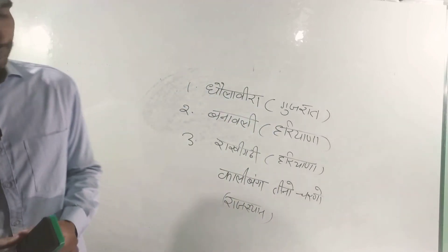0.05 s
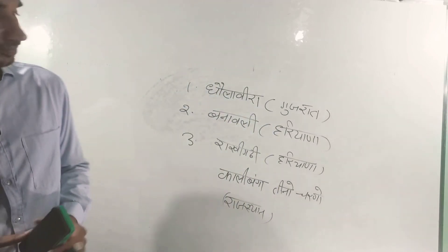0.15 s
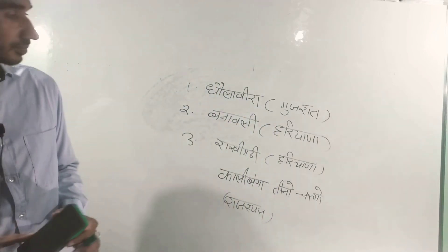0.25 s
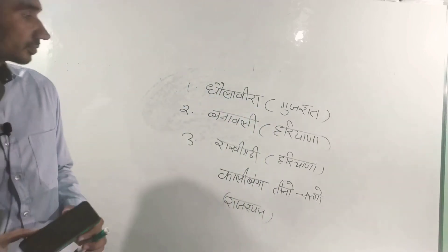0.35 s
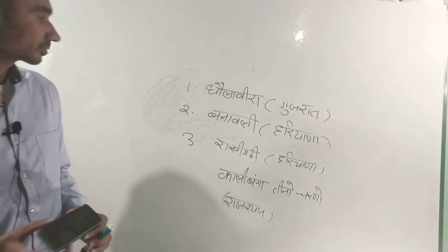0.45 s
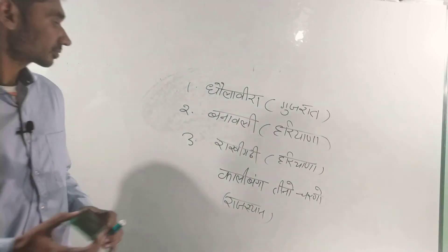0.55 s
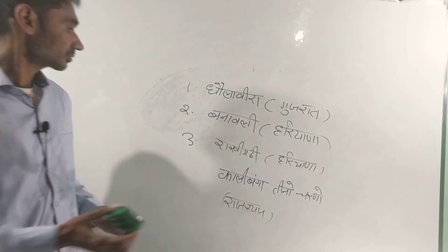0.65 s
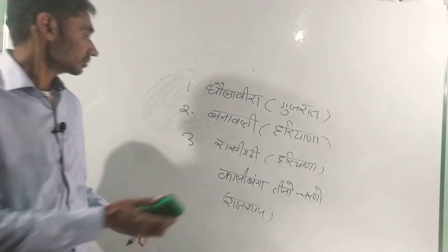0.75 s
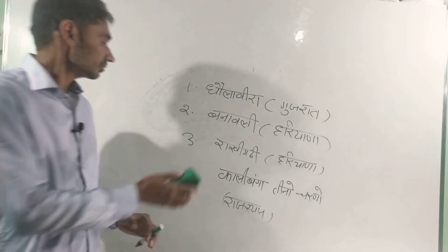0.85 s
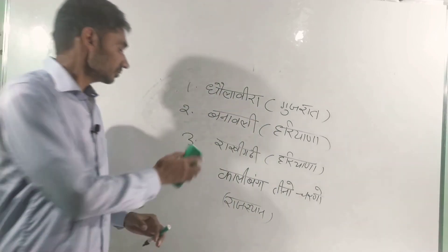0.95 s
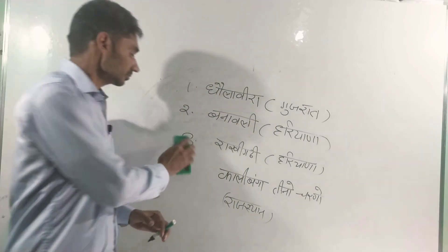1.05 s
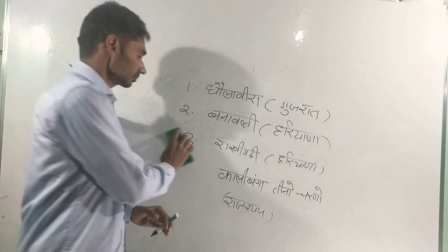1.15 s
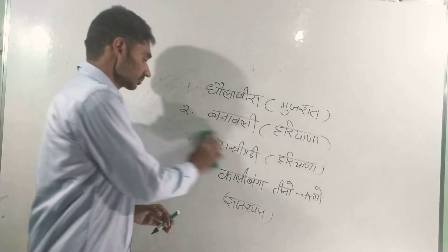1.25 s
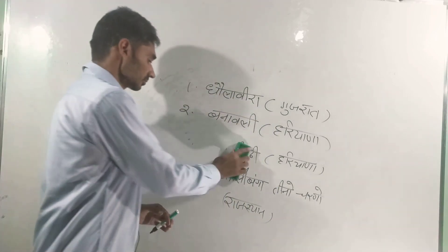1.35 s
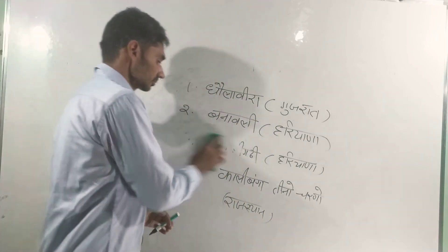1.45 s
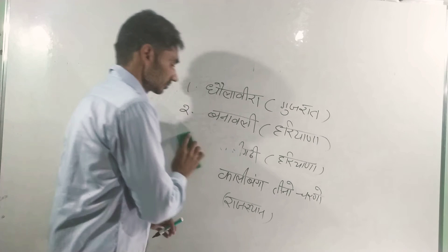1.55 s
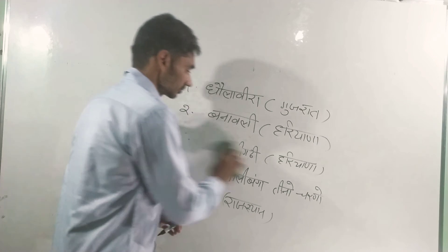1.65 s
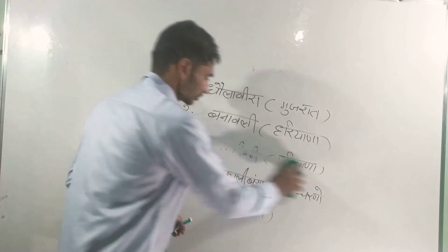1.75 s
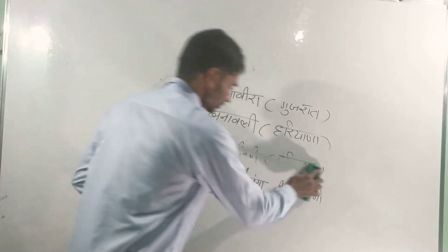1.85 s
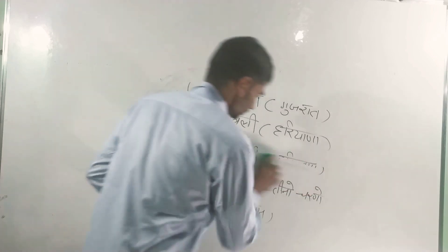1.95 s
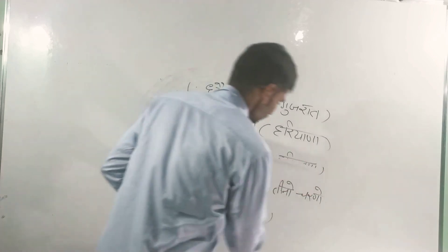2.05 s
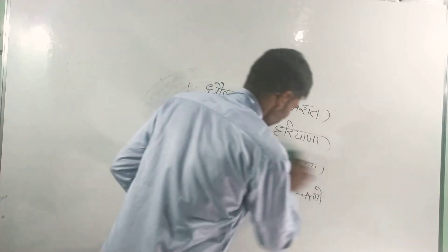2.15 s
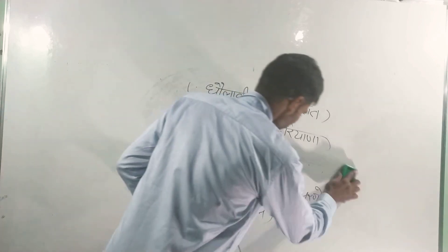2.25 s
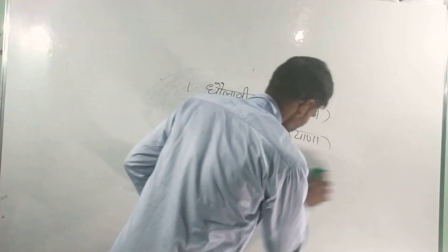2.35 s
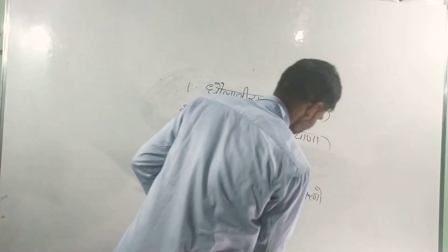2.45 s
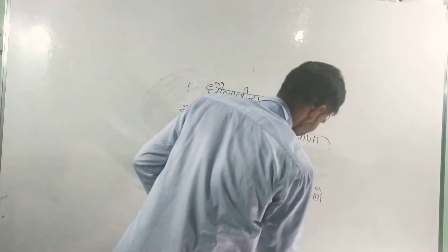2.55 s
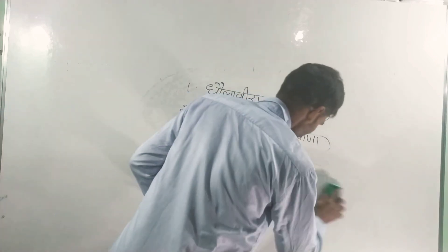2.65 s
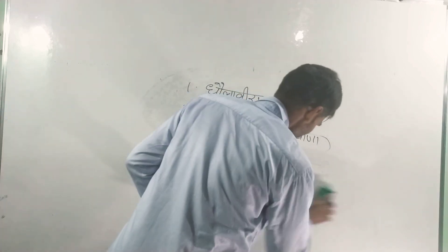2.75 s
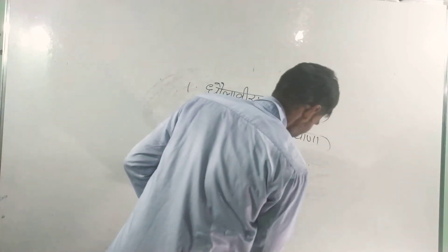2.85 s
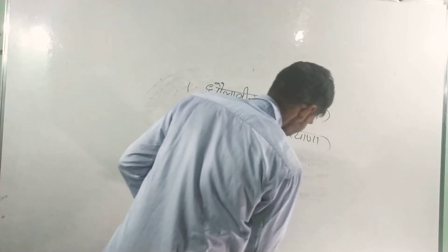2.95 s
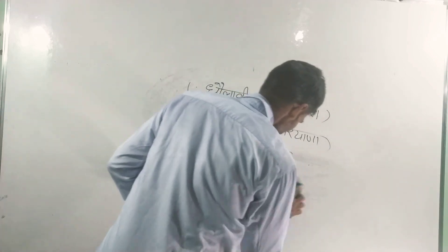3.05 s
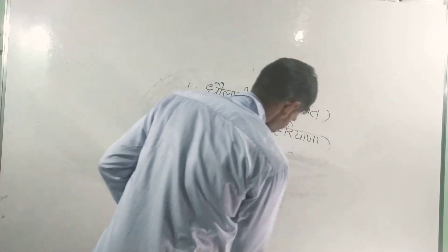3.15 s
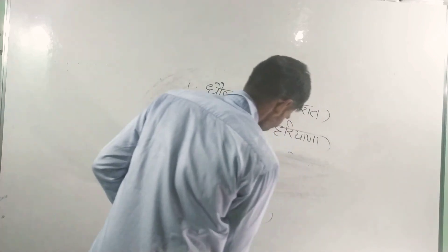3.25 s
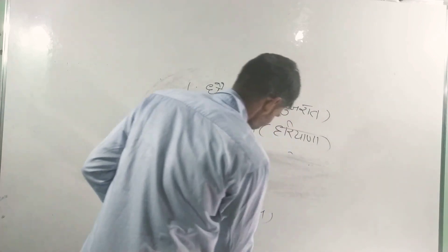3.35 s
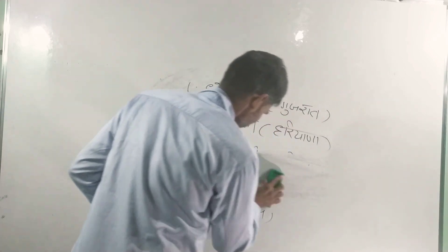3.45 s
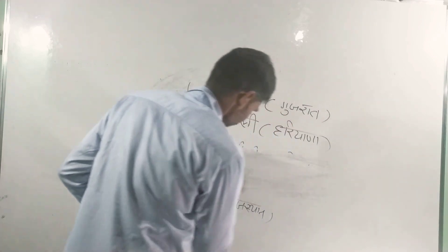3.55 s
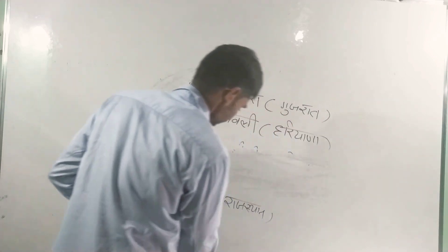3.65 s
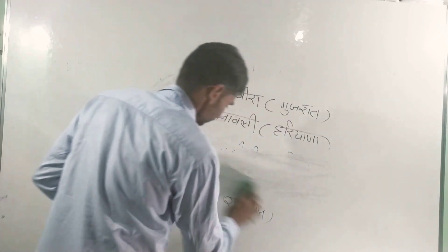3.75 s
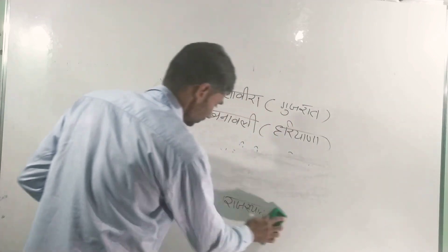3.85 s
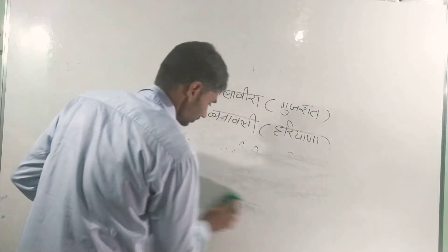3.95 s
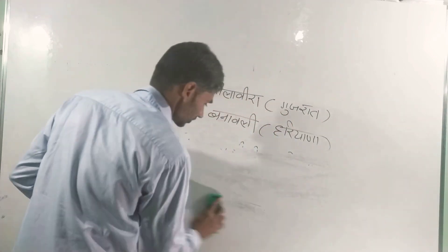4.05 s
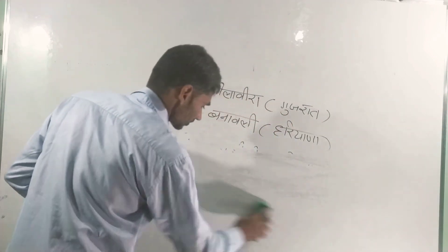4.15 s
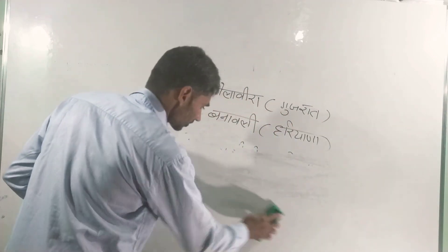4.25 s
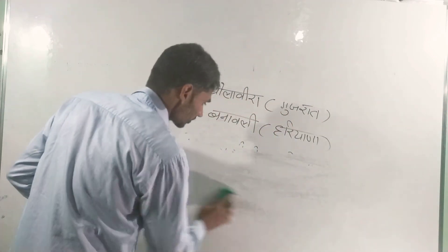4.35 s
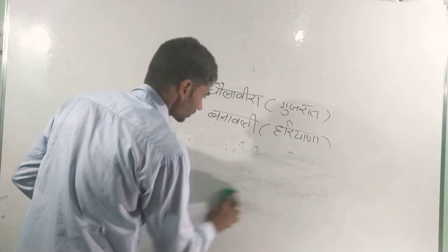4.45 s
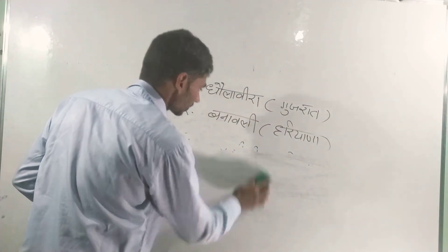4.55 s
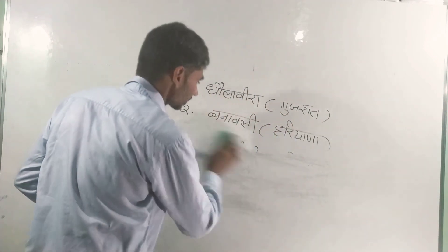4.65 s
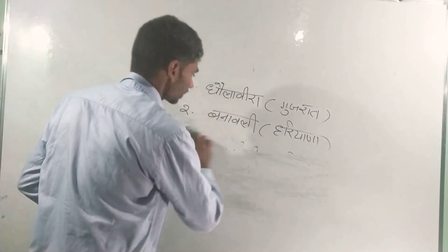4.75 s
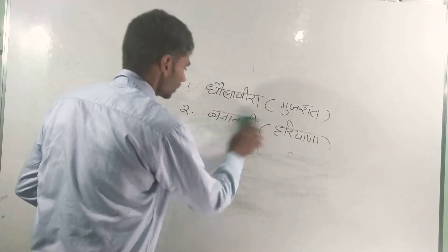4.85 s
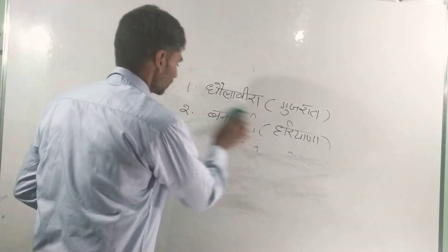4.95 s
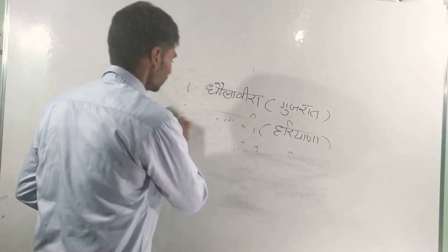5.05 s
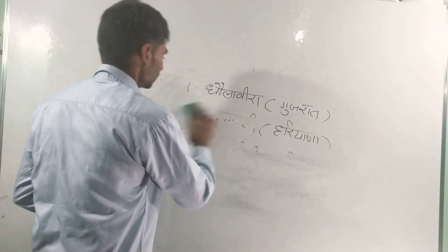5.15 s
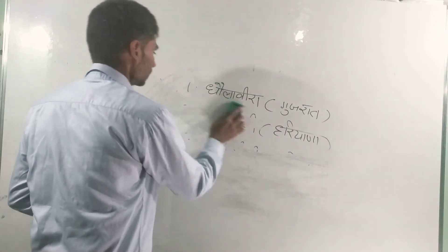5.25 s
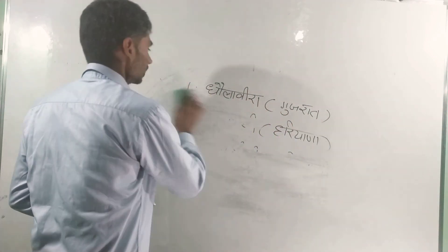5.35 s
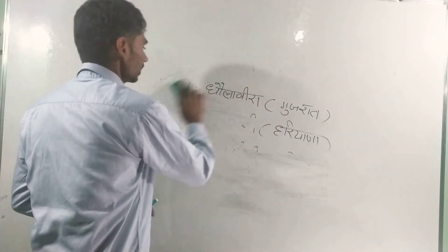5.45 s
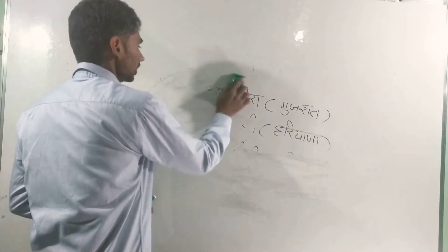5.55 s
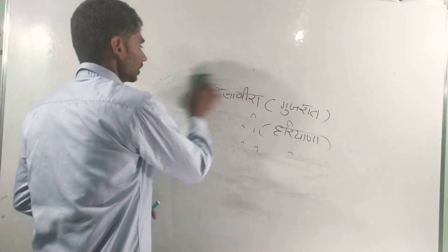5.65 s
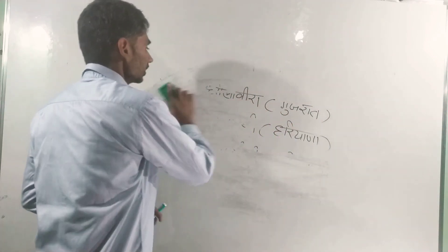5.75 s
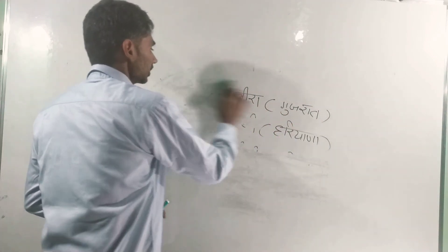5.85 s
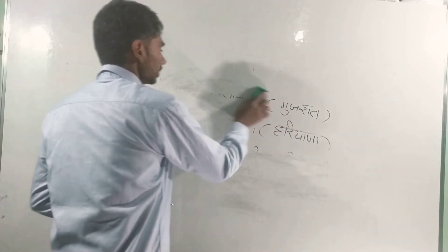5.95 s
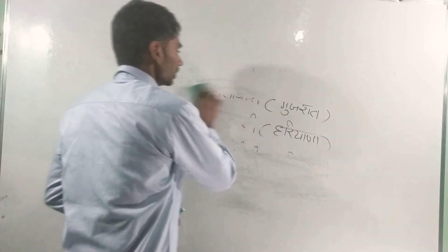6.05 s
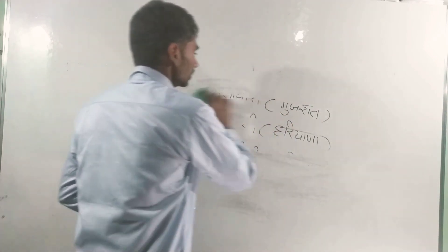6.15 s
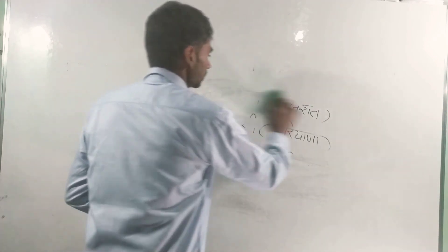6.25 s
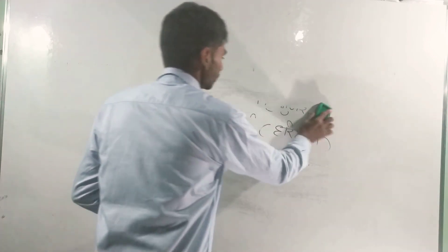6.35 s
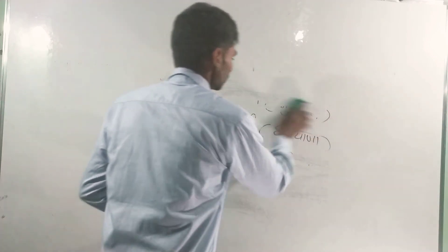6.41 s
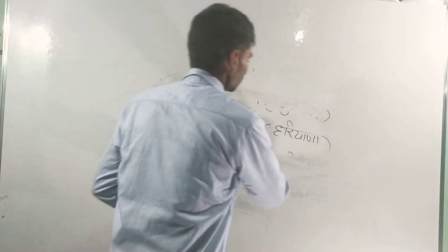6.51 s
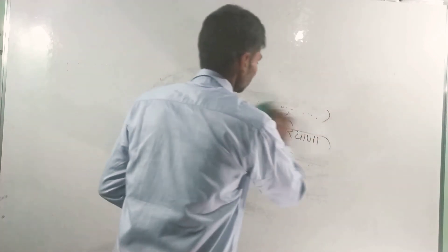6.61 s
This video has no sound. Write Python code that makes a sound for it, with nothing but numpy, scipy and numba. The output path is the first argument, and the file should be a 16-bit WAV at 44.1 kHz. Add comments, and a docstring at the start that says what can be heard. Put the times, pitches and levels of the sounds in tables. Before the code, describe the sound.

Close lapel microphone in a classroom with faint room hiss and a weak mains buzz. About a second of quiet shirt and hand rustle, then a sharp, hard knock as an eraser block lands on a whiteboard, ringing briefly through board and room. Quick felt strokes follow until the end, hissing and sizzling back and forth, with low soft thumps and rumble from the flexing panel and small gritty ticks.

```python
"""A felt eraser on a classroom whiteboard, heard by a lapel microphone on the shirt.
Room noise in flickering bands and a faint buzz of mains spikes run throughout; small ticks of filtered grit dot the scene.
Hand and shirt rustle first, as soft swells of filtered noise; then the eraser lands, its pushes ringing block, board and room.
Strokes to and fro follow: felt fibres hiss and sizzle as moving bands of noise, and the block hums.
The flexing panel rumbles in noise bands under the strokes, and thumps with short falling swings."""
import sys
import numpy as np
from scipy import signal
from scipy.io import wavfile
from scipy.ndimage import uniform_filter1d
from numba import njit

SR = 44100
rng = np.random.default_rng(int(sys.argv[2]) if len(sys.argv) > 2 else 0)


def wav_record(signal):
    """Record a signal, one row per channel, as 16-bit PCM in the file named by sys.argv[1]."""
    frames = np.transpose(np.atleast_2d(signal))
    bounded = np.clip(frames, -1, 1)
    # unit amplitude maps onto the largest positive 16-bit level
    quanta = np.round(bounded * 32767).astype(np.int16)
    wavfile.write(sys.argv[1], SR, quanta)


N = 294588


def undb(db):
    """Decibels to gain."""
    return 10 ** (np.asarray(db) / 20)


def unit(x):
    """Scale to rms 1."""
    return x / np.sqrt(np.mean(x ** 2))


@njit
def svf(x, hz, width):
    """State-variable band-pass whose centre may move every sample."""
    y = np.empty(len(x))
    band_state, low_state = 0., 0.
    for i in range(len(x)):
        g = np.tan(np.pi * hz[i] / SR)
        damping = width / hz[i]
        v = (band_state + g * (x[i] - low_state)) / (1 + g * (g + damping))
        band_state = 2 * v - band_state
        low_state = low_state + 2 * g * v
        y[i] = damping * v
    return y


def band(x, hz, width):
    """Fixed band-pass."""
    return svf(x, np.full(len(x), 1. * hz), 1. * width)


def double_band(x, hz, width):
    """Fixed band-pass applied twice, for steeper skirts."""
    return band(band(x, hz, width), hz, width)


def steep(x, hz, width):
    """Moving band-pass applied twice."""
    return svf(svf(x, hz, width), hz, width)


def ring(x, modes):
    """Sum of damped modes (frequency [Hz], level [dB], t60 [s], optional signed gain factor) struck by x."""
    total = np.zeros(len(x))
    for hz, db, t60, *sign in modes:
        gain = undb(db) * np.prod(sign)
        pole = np.exp((2j * np.pi * hz - np.log(1000) / t60) / SR)
        total += gain * signal.lfilter([1], [1, -pole], x).imag
    return total


def walk(rate):
    """Random levels at rate per second, slewed twice into a smooth drift of rms 1."""
    k = int(SR / rate)
    steps = np.repeat(rng.standard_normal(N // k + 1), k)
    return unit(uniform_filter1d(uniform_filter1d(steps, k), k)[:N])


def add(out, s, sound):
    """Mix a short sound in at time s."""
    i = int(s * SR)
    out[i:i + len(sound)] += sound[:N - i]


# strokes of felt over the board, levels before the mix of each layer:
# (peak time [s], rise [s], fall [s], lower hiss level [dB], upper hiss level [dB], sizzle level [dB],
#  block hum level [dB], rumble level [dB], lower hiss centre [Hz], upper hiss centre [Hz])
STROKES = [(1.341, 0.35, 0.27, -67, -70, -70, -68, -63.5, 2740, 3880),
           (1.592, 0.093, 0.052, -59.5, -62.5, -59.5, -62, -65, 3570, 4410),
           (1.709, 0.059, 0.058, -55, -66, -59.5, -60.5, -74, 3290, 4100),
           (1.789, 0.148, 0.21, -61, -60.5, -68.5, -64.5, -61, 3280, 4200),
           (2.07, 0.085, 0.049, -58.5, -57, -55, -61, -59, 3360, 4480),
           (2.213, 0.086, 0.12, -54, -67, -63.5, -62.5, -60.5, 3460, 3930),
           (2.311, 0.24, 0.062, -61, -67, -65, -66, -73, 3470, 3930),
           (2.506, 0.1, 0.091, -57, -59, -62.5, -65, -58, 3380, 4160),
           (2.646, 0.069, 0.2, -61, -66, -64.5, -67.5, -69, 3270, 4220),
           (2.701, 0.083, 0.078, -59, -62, -65, -63.5, -63.5, 3030, 4500),
           (2.925, 0.094, 0.067, -61, -60, -57.5, -66.5, -58.5, 3480, 4310),
           (3.098, 0.139, 0.098, -63, -65, -68.5, -64.5, -62, 3520, 4190),
           (3.29, 0.082, 0.061, -58.5, -59.5, -60, -69.5, -57.5, 3540, 4450),
           (3.459, 0.19, 0.15, -62.5, -63.5, -67.5, -65.5, -64, 3290, 4120),
           (3.645, 0.08, 0.08, -61.5, -62, -63, -64, -59, 3440, 4310),
           (3.824, 0.086, 0.079, -57, -60.5, -64, -62.5, -68, 3560, 4300),
           (3.886, 0.047, 0.082, -66, -63.5, -69.5, -71, -66, 2750, 4220),
           (4.045, 0.051, 0.054, -65, -59, -64, -74, -76, 3620, 4310),
           (4.135, 0.21, 0.086, -61, -65, -61.5, -64.5, -63.5, 3460, 4280),
           (4.217, 0.16, 0.13, -57, -55.5, -65, -61, -69, 2990, 4180),
           (4.453, 0.13, 0.05, -64, -59.5, -62, -66, -64.5, 3430, 4430),
           (4.575, 0.089, 0.097, -65, -57, -66, -61, -66, 3110, 4080),
           (4.75, 0.082, 0.08, -67, -56.5, -58.5, -64.5, -58, 2820, 4630),
           (4.875, 0.042, 0.11, -55, -57, -59.5, -60, -60.5, 3540, 4340),
           (5.117, 0.11, 0.035, -60, -57.5, -55.5, -60.5, -63, 3350, 4790),
           (5.27, 0.21, 0.065, -62.5, -63, -67, -62, -64.5, 2860, 4580),
           (5.456, 0.136, 0.03, -65, -65, -63.5, -64.5, -68, 3300, 4910),
           (5.555, 0.096, 0.15, -60.5, -63.5, -67.5, -61, -62.5, 2870, 4620),
           (5.779, 0.12, 0.054, -59, -65, -65.5, -64.5, -61, 3390, 4090),
           (5.884, 0.068, 0.17, -59, -58.5, -65.5, -58, -62.5, 2960, 4730),
           (5.959, 0.063, 0.068, -62, -70, -73, -70, -63, 3130, 4000),
           (6.152, 0.15, 0.036, -62, -62, -63, -64, -62, 3350, 4400),
           (6.26, 0.073, 0.2, -60.5, -61, -64.5, -61, -64, 2890, 4560),
           (6.358, 0.19, 0.087, -56, -67, -66, -61, -67.5, 2840, 4180),
           (6.558, 0.15, 0.13, -61, -67, -66, -64.5, -65, 3330, 4060),
           (6.679, 0.042, 0.077, -62, -60, -62, -59, -58, 3560, 4530)]
# hand and shirt rustle before the knock, with the same columns as the strokes
RUSTLES = [(.2, .3, 0.18, -82, -79, -80, -76, -79, 3000, 4700),
           (.44, 0.042, .04, -85, -80, -88, -82, -67, 3100, 4700),
           (.505, 0.018, 0.022, -74, -68.5, -82, -71, -80, 2670, 4500),
           (.708, .049, .14, -65.5, -75, -75, -65, -64, 2960, 4200),
           (.902, .019, 0.12, -67, -71, -74, -64, -62.5, 3030, 4600),
           (1.053, .12, .26, -68, -70.5, -79, -64.5, -65.5, 3100, 4400)]
# how far each layer has dropped one rise before and one fall after a peak: layer name: drop [dB]
DEPTH_DB = {"lower": 18.5, "upper": 22, "sizzle": 24, "block": 12.5, "rumble": 12}
BELL = 1.3  # 1 = pointed swell, 2 = round


def swell(layer):
    """Gain of one layer: every stroke and rustle swells and fades like a lopsided bell; powers add."""
    power = np.zeros(N)
    column = 3 + list(DEPTH_DB).index(layer)
    for row in [*RUSTLES, *STROKES]:
        s, rise, fall = row[:3]
        first = max(int((s - 3 * rise) * SR), 0)
        last = min(int((s + 3 * fall) * SR), N)
        i = np.arange(first, last)
        late = i / SR - s
        distance = np.where(late < 0, -late / rise, late / fall)
        power[i] += undb(row[column] - DEPTH_DB[layer] * distance ** BELL) ** 2
    return np.sqrt(power)


def fibres(scatter_db, patchy_db):
    """Dense noisy slips in patches; scatter makes their sizes uneven."""
    level_db = scatter_db * rng.exponential(size=N) + patchy_db * walk(60)
    return rng.standard_normal(N) * undb(level_db)


def nap(low_hz, octaves, flicker_db):
    """Narrow bands of slips that flare one by one as the nap of the felt turns; their sum keeps its strength."""
    slips = fibres(scatter_db=1.5, patchy_db=1.8)
    centres = low_hz * 2 ** np.arange(0, octaves, 1 / 8)
    flares = np.array([undb(flicker_db * walk(18)) for _ in centres])
    flares /= np.sqrt(np.mean(flares ** 2, axis=0))
    return unit(sum(g * unit(band(slips, f, f / 11)) for g, f in zip(flares, centres)))


# resonances of the eraser block, widths before broadening: (frequency [Hz], width [Hz], level [dB])
BLOCK_MODES = [(734, 570, -3), (1012, 510, -5.5), (1379, 483, -1), (2050, 710, -6.5)]
BLOCK_LOW_DB = -75  # lowest mode of the block, steadier in the hand
SIZZLE_HZ = 6850  # mean centre
SIZZLE_FOLLOWS = 0.72  # Hz of sizzle per Hz that the lower hiss moves
RUB_ECHO_DB, RUB_ECHO_T60_S = -13.5, 0.43


def rubbing():
    """Felt on enamel: two resonances that move with the stroke, a sizzle on top, the block humming below."""
    rows = np.vstack([RUSTLES, STROKES])
    low_hz, high_hz = (np.interp(np.arange(N) / SR, rows[:, 0], hz) for hz in rows[:, -2:].T)
    slips = fibres(scatter_db=0.0, patchy_db=1.6)

    low, high = swell("lower"), swell("upper")
    hiss = low * unit(steep(slips, low_hz, 980.0))
    hiss += 0.79 * high * unit(steep(slips, high_hz, 530.0))
    hiss += 0.93 * np.hypot(low, high) * nap(low_hz=2236, octaves=1.3, flicker_db=5.0)
    hiss *= undb(-3.0)

    sizzle_hz = SIZZLE_HZ + SIZZLE_FOLLOWS * (low_hz - low_hz.mean())
    sizzle = unit(steep(rng.standard_normal(N), sizzle_hz, 2000.0))
    sizzle += 0.58 * nap(low_hz=5800, octaves=.6, flicker_db=4.0)
    sizzle *= undb(-2.5) * swell("sizzle")

    lowest, *upper = (undb(db + 2.0 * walk(20)) * unit(double_band(slips, f, 1.35 * w))
                      for f, w, db in BLOCK_MODES)
    hum = swell("block")
    held = uniform_filter1d(hum, SR // 2) / hum.mean()  # half-second average of the strokes
    block = undb(-2.5) * hum * sum(upper)
    block += undb(BLOCK_LOW_DB + 1.8 * walk(11)) * held * lowest

    direct = hiss + sizzle + block
    t = np.arange(SR // 2) / SR
    echo = rng.standard_normal(len(t)) * undb(-60 * t / RUB_ECHO_T60_S)  # walls fill the pauses
    echo /= np.linalg.norm(echo)
    return direct + undb(RUB_ECHO_DB) * signal.fftconvolve(direct, echo)[:N]


# eraser lands on the board, corner first, then the face with a short chatter:
# (time [s], push level, summed over the push [dB], contact [ms])
BLOWS = [(1.194, -24.5, 0.57), (1.1951, -28, 0.77), (1.2208, -28, 0.49), (1.2221, -23, 0.91),
         (1.2230, -9.5, 0.32)]
# crack of the eraser block: (frequency [Hz], relative level [dB], t60 [s], signed gain factor)
CRACK = [(476, 7, 0.073, 0.34), (910, 4.5, 0.027, 0.74), (1280, 15.5, 0.0052, 0.71),
         (2470, 16, 0.0061, 0.4), (3070, 8, 0.011, -0.65), (3560, -0.5, 0.014, 1),
         (2110, -7.5, 0.024, -0.64)]
# ringing modes of the board: (frequency [Hz], relative level [dB], t60 [s])
BOARD = [(127.4, -2.5, 0.23), (266, -26, 0.49), (359, -11.5, 0.51), (420, -12.5, 0.7), (473, 2, 0.19),
         (640, -21, 0.26), (620, -6.5, 0.28), (711, -3.5, 0.24), (803, -16, 0.26), (1006, -13.5, 0.51),
         (1125, -15.5, 0.37), (1168, -36, 0.71)]
# bands of the room's reply to the knock: (frequency [Hz], relative level [dB], t60 [s])
ROOM = [(125, -24, 0.23), (298, -27.5, 0.5), (468, -21, 0.52), (744, -19, 0.47), (1070, -20, 0.21),
        (1520, -44, 0.73), (2570, -29, 0.35), (3600, -41, .2)]


def knock():
    """Smooth pushes crack the block, ring the board and fill the room."""
    push = np.zeros(N)
    for s, db, ms in BLOWS:
        shape = np.sin(np.pi * np.clip(np.arange(64) / SR * 1000 / ms, 0, 1)) ** 2
        add(push, s, undb(db) * shape / shape.sum())

    t = np.arange(SR // 2) / SR
    tail = np.zeros(len(t))
    for hz, db, t60 in ROOM:
        noise = unit(double_band(rng.standard_normal(len(t)), hz, 0.54 * hz))
        tail += undb(db) * noise * undb(-60 * t / t60)
    tail *= 1 - np.exp(-t / 0.0015)  # echoes need a moment to gather

    no_bass = signal.butter(2, 260, "high", fs=SR, output="sos")  # a small block sends out no bass
    crack = signal.sosfilt(no_bass, ring(push, CRACK))
    room = signal.fftconvolve(push, tail)[:N]
    return 0.34 * crack + undb(-24.5) * ring(push, BOARD) + undb(-8.5) * room


# soft thumps of the flexing panel, before the panel's low-pass; the pitch glides down through the nominal one:
# (time [s], peak level [dB], nominal pitch [Hz], sway level [dB])
THUMPS = [(2.123, -37.5, 220, -50), (2.197, -41, 298, -58), (2.502, -42, 230, -48), (2.901, -38, 264, -45),
          (2.976, -40, 181, -44), (2.993, -42.5, 200, -43), (3.315, -33, 199, -44),
          (3.327, -41.5, 150, -46), (3.38, -47, 200, -56), (3.393, -42.5, 200, -52),
          (3.454, -38.5, 240, -46), (3.706, -43.5, 283, -58), (4.093, -42, 229, -54),
          (4.315, -49.5, 200, -60), (4.449, -41, 271, -53), (4.581, -51, 220, -52),
          (4.839, -47.5, 190, -58), (4.949, -51, 126, -58), (5.181, -42, 283, -60),
          (5.186, -38.5, 278, -58), (5.525, -47.5, 170, -58), (5.652, -47.5, 206, -56),
          (6.016, -51, 240, -58), (6.118, -50, 147, -55), (6.289, -45, 140, -52), (6.297, -45.5, 220, -57),
          (6.603, -45, 157, -56), (6.628, -37, 190, -48)]
THUMP_CYCLES = 3.26  # cycles of the nominal pitch to fall 60 dB
THUMP_TOP_HZ = 417  # the panel passes little of a thump above this
SWAY_HZ, SWAY_T60_S = 85, .09  # slow sway of the whole panel after a thump


def thumps():
    """A few fast-dying low swings each, in or out, higher pitch first; the panel sways with them."""
    out = np.zeros(N)
    t = np.arange(SR // 4) / SR
    sway = undb(-60 * t / SWAY_T60_S) * np.sin(2 * np.pi * SWAY_HZ * t) * (1 - np.exp(-t / .005))
    signs = np.sign(rng.standard_normal(len(THUMPS)))
    for (s, db, hz, sway_db), sign in zip(THUMPS, signs):
        turns = hz * (0.7 * t + 0.005 * (1 - np.exp(-t / 0.013)))
        attack = (1 - np.exp(-t * hz * 3.5)) ** 2
        swing = np.sin(2 * np.pi * turns) * undb(-60 * t * hz / THUMP_CYCLES) * attack
        swing /= np.abs(swing).max()
        add(out, s, sign * (undb(db) * swing + undb(sway_db) * sway))
    return signal.sosfiltfilt(signal.butter(3, THUMP_TOP_HZ, fs=SR, output="sos"), out)


# low modes of the panel: (frequency [Hz], width [Hz], relative level [dB])
RUMBLE_MODES = [(93, 37, -1.5), (129, 45, 1), (230, 80, -13.5), (320.5, 43, -5)]
RUMBLE_LAG_S = 0.018  # the panel answers the stroke late
AFTER_THUMP_DB, AFTER_THUMP_T60_S = -17, 0.25  # rumble left by a thump, relative to its peak


def rumble():
    """The panel's low modes, shaken unevenly by the strokes and left moving by each thump."""
    modes = sum(undb(db + 2.6 * walk(14)) * unit(band(rng.standard_normal(N), f, w))
                for f, w, db in RUMBLE_MODES)
    power = np.roll(swell("rumble"), int(RUMBLE_LAG_S * SR)) ** 2
    power *= np.arange(N) > RUMBLE_LAG_S * SR  # silence what wrapped round from the end
    t = np.arange(SR // 2) / SR
    for s, db, *_ in THUMPS:
        add(power, s, undb(db + AFTER_THUMP_DB - 60 * t / AFTER_THUMP_T60_S) ** 2)
    return np.sqrt(power) * unit(modes)


# small hard ticks and scrapes, levels before a common 12 dB cut:
# (time [s], level [dB], frequency [Hz], width [Hz], t60 [s])
TICKS = [(.432, -68, 860, 500, .018), (0.496, -49, 1350, 400, 0.041), (.655, -51, 6000, 4000, .0093),
         (.833, -58, 6800, 2000, 0.011), (.896, -47.5, 1500, 1500, 0.021), (1.194, -45, 7040, 3000, .012),
         (1.195, -41.5, 3630, 700, .013), (1.2217, -41, 6560, 3530, 0.018), (2.500, -40, 1530, 900, 0.017),
         (2.900, -36, 1650, 1000, .014), (2.990, -44.5, 1700, 900, 0.013),
         (3.453, -39.5, 1700, 1300, 0.015), (3.531, -50.5, 694, 150, 0.043), (3.533, -49, 1380, 900, 0.034),
         (3.706, -47.5, 1400, 900, 0.012), (3.873, -45, 1510, 1200, 0.013),
         (4.311, -43.5, 1170, 403, 0.045), (4.449, -37.5, 1670, 1000, 0.0093),
         (4.72, -53.5, 694, 300, 0.34), (4.786, -48.5, 840, 300, 0.041), (4.928, -48, 6500, 2500, .015),
         (4.957, -37.5, 2400, 500, 0.015), (4.981, -45.5, 1080, 700, 0.022),
         (5.177, -41, 1960, 2000, 0.013), (5.52, -51.5, 1390, 250, 0.11), (5.657, -47, 950, 600, .033),
         (5.660, -53, 6500, 3000, .012), (5.698, -53, 1580, 900, .02), (5.700, -50.5, 6370, 2500, .015)]
TICK_ATTACK = 2.8  # attack s = this x t60 squared, at most 0.02 s: long scrapes start softly
TICK_TOUCH = 5.1  # first contact against the grit that follows


def ticks():
    """Short bursts of grit in a small resonance."""
    out = np.zeros(N)
    t = np.arange(1, SR // 5) / SR
    grit = rng.standard_normal((len(TICKS), len(t)))
    for (s, db, hz, width, t60), noise in zip(TICKS, grit):
        attack = 1 - np.exp(-t / min(TICK_ATTACK * t60 ** 2, .02))
        shape = undb(-60 * t / t60) * attack
        force = noise * shape
        force[0] += TICK_TOUCH * shape[SR // 2000]  # quick ticks open with a clean click
        burst = double_band(force, hz, width)
        early_rms = np.sqrt(np.mean(burst[:int(t60 / 4 * SR)] ** 2))
        add(out, s, undb(db - 12) * burst / early_rms)
    return out


# ringing of each mains spike: (frequency [Hz], relative level [dB], t60 [s])
BUZZ = [(370, 0.5, 0.0029), (1140, 10.5, 0.0022), (2180, -0.5, 0.005), (3030, -15.5, 0.0041),
        (3880, -14.5, 0.016)]
BUZZ_DB, MAINS_HZ, MAINS_START_S = -69, 50.779, .0002


def buzz():
    """A switching spike every half cycle of the mains, alternating in sign, rings a few resonances."""
    count = np.arange(int(N / SR * 2 * MAINS_HZ))
    place = (MAINS_START_S + count / (2 * MAINS_HZ)) * SR
    whole = place.astype(int)
    sign = (-1.) ** count
    spikes = np.zeros(N + 1)
    spikes[whole] = sign * (1 - place + whole)  # share each spike between two samples
    spikes[whole + 1] = sign * (place - whole)
    return undb(BUZZ_DB) * unit(ring(spikes[:N], BUZZ))


# spectrum of the room noise: (frequency [Hz], relative level per Hz [dB])
AIR = [(24, -42), (40, -25), (111, 0.5), (547, -4.5), (611, -5), (952, -11), (1770, -13.5), (5130, -15.5),
       (8000, -22.5), (10400, -45), (17600, -120)]
AIR_DB = -69.5


def air():
    """Room noise in half-octave bands that flicker alone."""
    hz, db = np.transpose(AIR)
    total = np.zeros(N)
    for f in 45 * 2 ** np.arange(0, 7.6, .5):
        level_db = np.interp(np.log(f), np.log(hz), db) + 1.3 * walk(6)
        total += undb(level_db) * band(rng.standard_normal(N), f, f / 3)
    return undb(AIR_DB) * unit(total)


def scene():
    """Everything the microphone hears."""
    eraser = rubbing() + knock()
    panel = thumps() + rumble()
    return (eraser + panel + ticks() + buzz() + air())[None]


TOP_HZ = 7750


def record(dry):
    """The microphone drops the deep bass and the recorder cuts the top."""
    thin = signal.sosfilt(signal.butter(4, 62, "high", fs=SR, output="sos"), dry)
    return signal.sosfilt(signal.cheby1(10, .5, TOP_HZ, fs=SR, output="sos"), thin)


dry = scene()
out = record(dry)
wav_record(out)
```